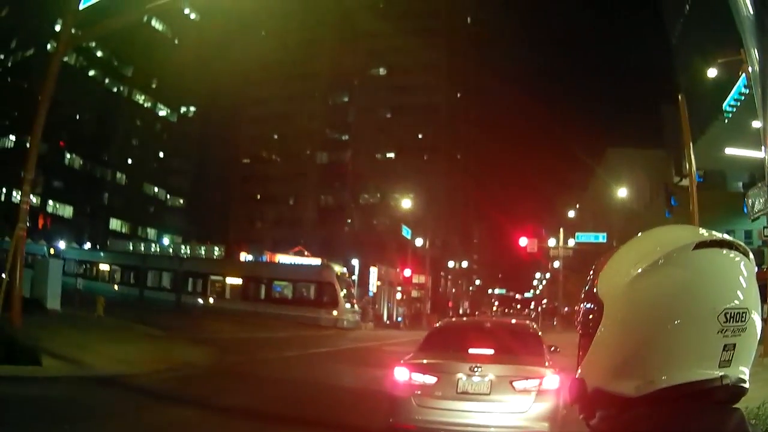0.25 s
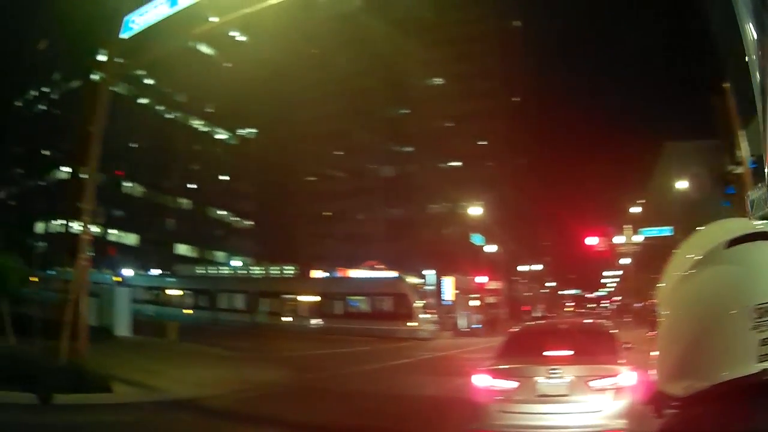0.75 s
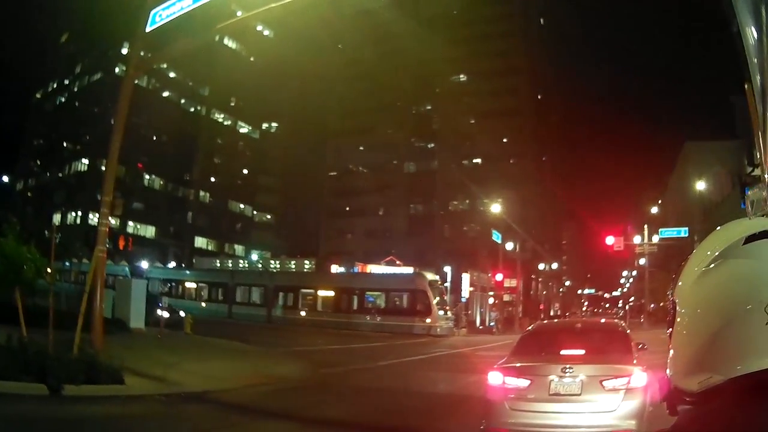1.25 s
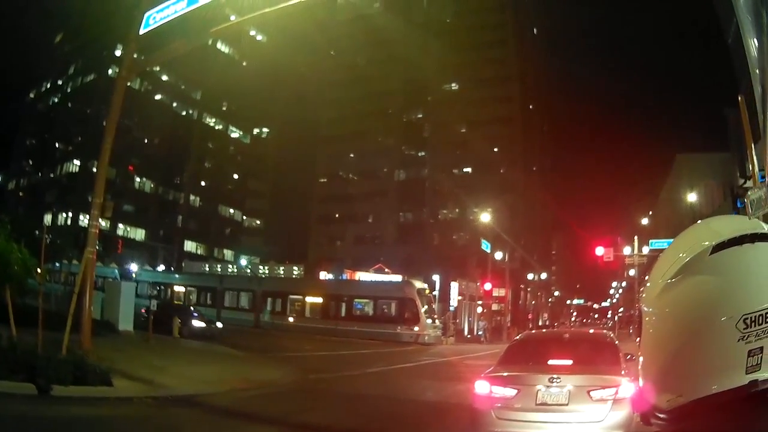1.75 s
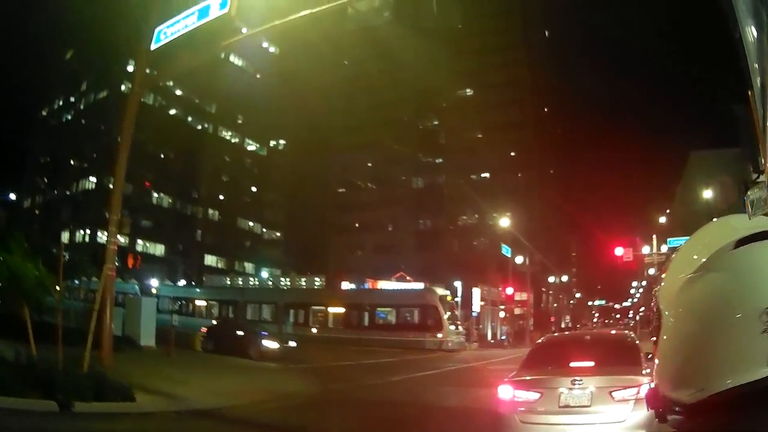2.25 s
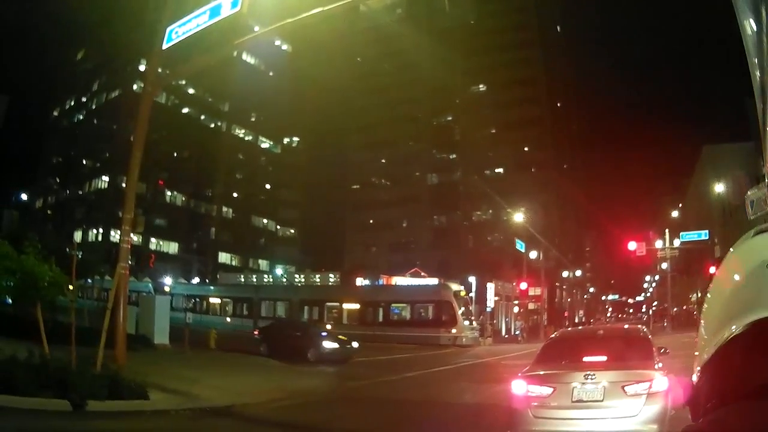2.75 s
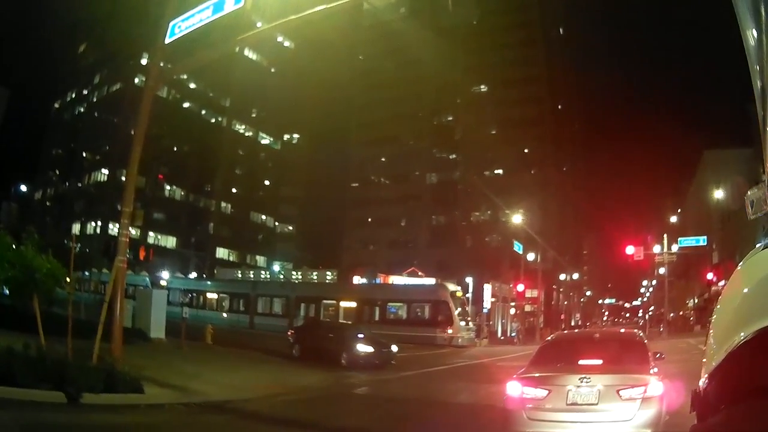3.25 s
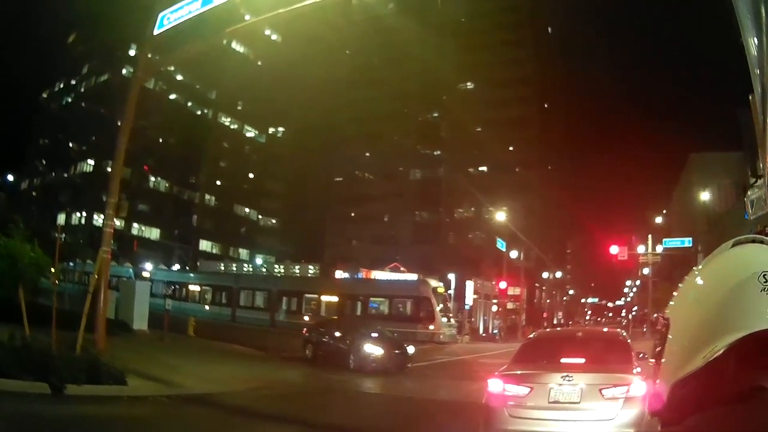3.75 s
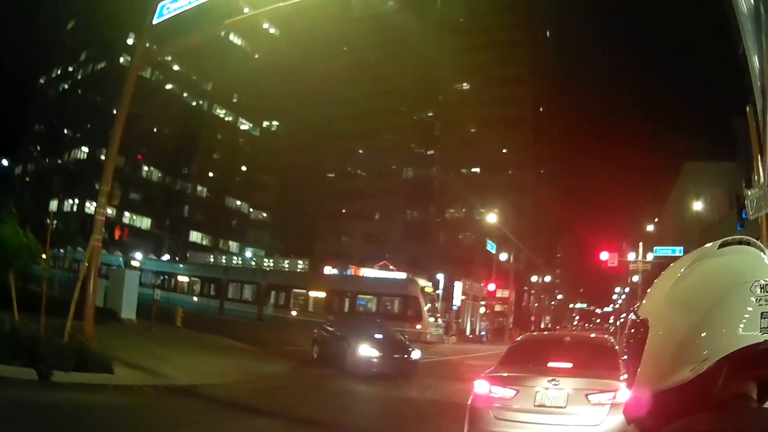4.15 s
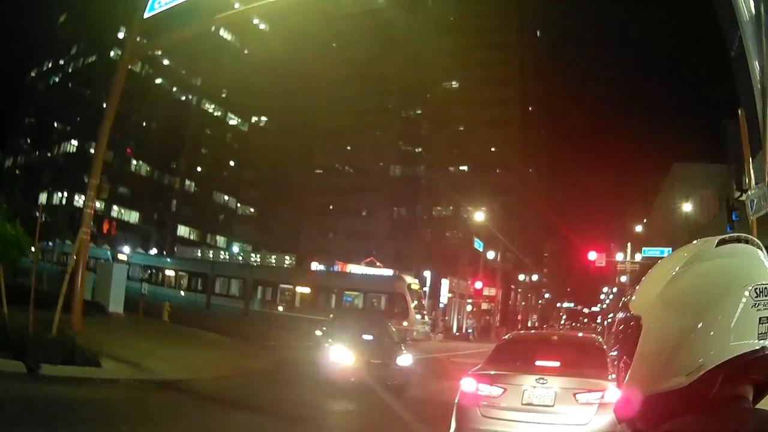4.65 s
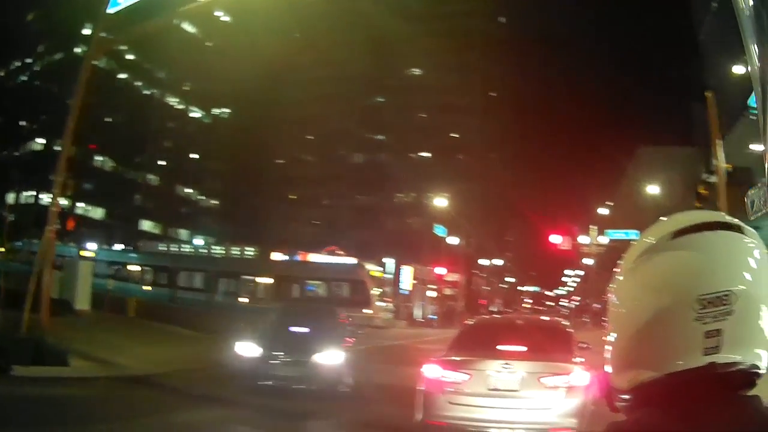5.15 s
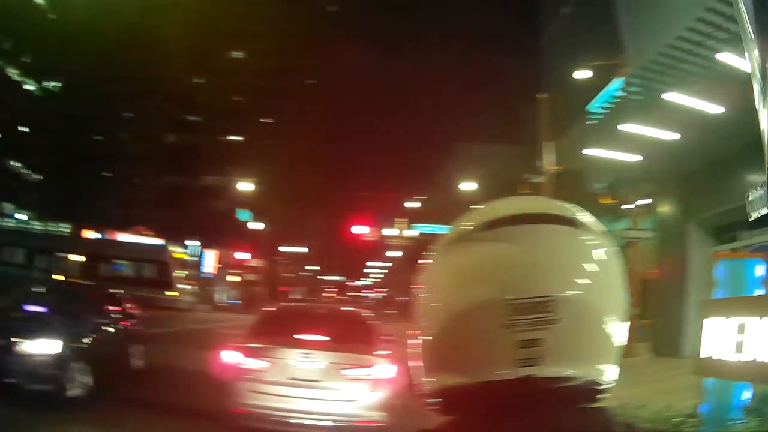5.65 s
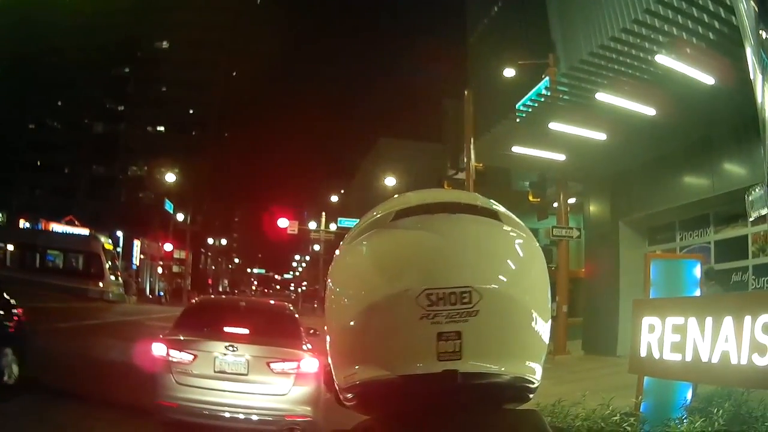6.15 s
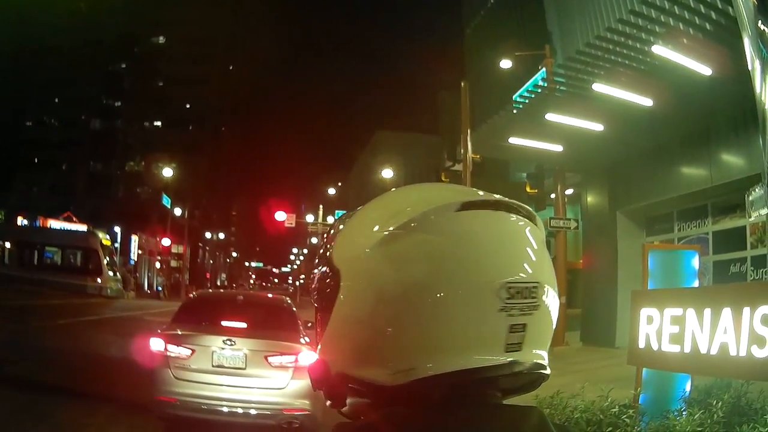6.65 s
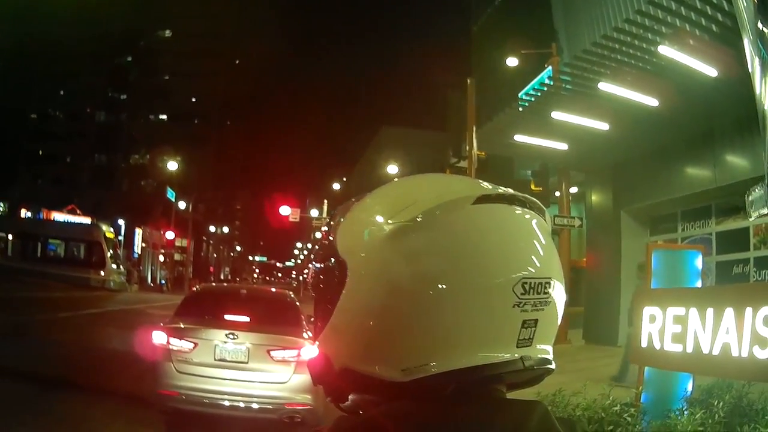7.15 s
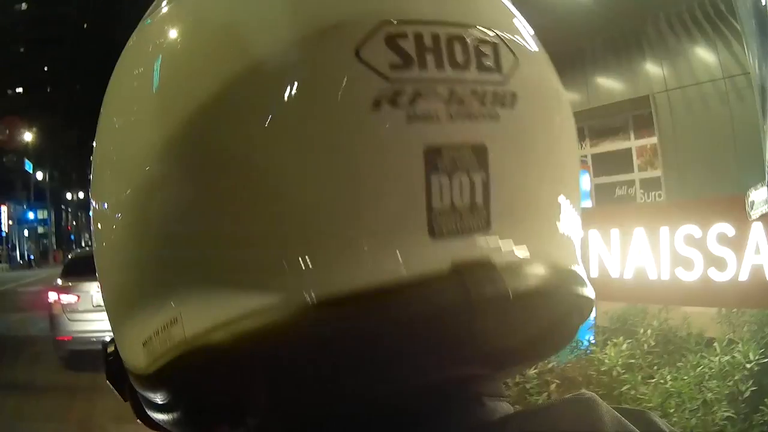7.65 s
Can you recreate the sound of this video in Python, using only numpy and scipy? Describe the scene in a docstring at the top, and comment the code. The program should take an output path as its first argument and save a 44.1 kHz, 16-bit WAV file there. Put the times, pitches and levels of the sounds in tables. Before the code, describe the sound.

A four-cylinder motorcycle idles close to the microphone outdoors in a city street, a deep bassy throb with muffled exhaust burble and light mechanical clatter. The idle hunts gently and briefly stumbles. After about six seconds the throttle opens, two tiny whistles lead into a hard barking blip, revs fall back, and softer pulls follow. Faint street noise and microphone hiss lie beneath.

```python
"""A four-cylinder motorcycle idles: its exhaust throbs as a sum of waves tied to the firing rate, single
firings ring the silencer, gas hisses, and filtered noise clatters like valve gear in the engine cases.
Now and then a weak firing makes the level dip. After six seconds the throttle is worked and each pull
swells the sound; two short whistling tones come, then the hardest blip barks a few times, and more pulls
follow. Faint street noise and microphone hiss, made of coloured noise, lie under it all."""
import sys
import numpy as np
from scipy import signal
from scipy.fft import rfft, irfft
from scipy.io import wavfile
from scipy.ndimage import uniform_filter1d

SR = 44100
rng = np.random.default_rng(int(sys.argv[2]) if len(sys.argv) > 2 else 0)


def dump(signal):
    """Clip the signal to [-1, 1] and save it as 16-bit WAV at the path in sys.argv[1]."""
    limited = np.clip(np.atleast_2d(signal).T, -1, 1)
    pcm = np.round(limited * 32767).astype(np.int16)
    wavfile.write(sys.argv[1], SR, pcm)


N = 348831
TIME = np.arange(N) / SR  # s

# weak firings: (time [s], length [s], dip of the throb [dB], ragged burning against the throb [dB])
WEAK_FIRINGS = [(.32, 0.04, -2.5, -14), (2.83, 0.034, -5.5, 3), (4.14, 0.014, -7, -7),
                (6.224, 0.042, -10, -11), (6.35, 0.016, -5, -11.5), (6.517, 0.024, -6.5, -21),
                (6.683, 0.023, -7, -23), (6.856, 0.059, -6, -16), (6.963, 0.034, -18, -27),
                (7.08, .02, -3.5, -7.5), (7.295, 0.026, -4.5, -10), (7.385, .025, -5, -8),
                (7.568, 0.089, -2.5, -11), (7.9, 0.055, -2.5, -13)]


def undb(db):
    """Turn decibels into a gain."""
    return 10 ** (np.asarray(db) / 20)


def unit(x):
    """Scale a sound to an average strength (rms) of 1."""
    return x / np.sqrt(np.mean(x ** 2))


def curves(rows):
    """Join the values in each column of a table by straight lines in time."""
    s, *columns = np.transpose(rows)
    return [np.interp(TIME, s, column) for column in columns]


def noise():
    """White noise: all pitches equally strong."""
    return rng.standard_normal(N)


def walk(rate):
    """A smooth random curve of rms 1 that changes about rate times a second."""
    hold = int(SR / rate)
    steps = np.repeat(rng.standard_normal(N // hold + 1), hold)
    return unit(uniform_filter1d(steps, hold)[:N])


def bell(s, length):
    """A smooth swell of height 1 around the time s."""
    return np.exp(-np.minimum(((TIME - s) / length) ** 2, 50))


def fade(x, decay_s):
    """Turn every impulse into an exponential decay of the same height."""
    return signal.lfilter([1], [1, -np.exp(-1 / (decay_s * SR))], x)


def band(x, order, low_hz, high_hz):
    """Keep the pitches between two limits."""
    return signal.sosfilt(signal.butter(order, [low_hz, high_hz], "band", fs=SR, output="sos"), x)


def ring(x, resonances):
    """Let a sound ring each resonance: the narrower its width, the longer it rings."""
    total = 0
    for hz, width, db in resonances:
        total = total + undb(db) * signal.lfilter(*signal.iirpeak(hz, hz / width, SR), x)
    return total


def colour(x, points):
    """Filter to the given (frequency [Hz], level [dB]) spectrum; white noise keeps its power."""
    hz, db = np.transpose(points)
    size = 8192
    f = np.maximum(np.fft.rfftfreq(size, 1 / SR), 1)
    # folding the cepstrum forward makes the filter respond only after its input
    cepstrum = irfft(np.log(undb(np.interp(np.log(f), np.log(hz), db))))
    cepstrum[1:size // 2] *= 2
    cepstrum[size // 2 + 1:] = 0
    response = irfft(np.exp(rfft(cepstrum)))
    return signal.fftconvolve(x, response / np.linalg.norm(response))[:N]


def throb(turns, hz, first_db, second_db, waver_db=2.0):
    """Smooth pressure wave at the tailpipe; it lopes once per crank turn, and its overtones waver."""
    # overtones: (multiple of the firing rate, level against the second harmonic [dB])
    overtones = [(3, -9.5), (4, -16), (5, -25.5), (6, -39.5), (7, -28.5), (9, -31)]
    lope, uneven = .13, .065  # depth of the swing per crank turn, and of the chance change between firings
    half_order_db, outlet_hz = -14, 46  # crank-rate tone against the fundamental; cut-off of the outlet
    angle = 2 * np.pi * turns
    # the fundamental lies under the pipe's first resonance, so it swings against its overtones
    wave = undb(first_db) * np.cos(angle) - undb(second_db) * np.cos(2 * angle)
    for multiple, db in overtones:
        wave -= undb(second_db + db + waver_db * walk(25)) * np.cos(multiple * angle)
    # the crank rate, half the firing rate, only gets out once the revs lift it above the outlet's cut-off
    outlet_loss = 1 + (2 * outlet_hz / hz) ** 10
    wave -= undb(first_db + half_order_db) * np.sin(angle / 2) / outlet_loss
    swing = 1 + lope * np.sin(angle / 2) + uneven * walk(60)
    return np.sqrt(2) * wave * swing * undb(stumbles())


def burble(first_db):
    """Ragged burning fills the bass between the harmonics, most of all around a stumble."""
    steady_db = -20  # against the throb
    spread = 1.9  # a stumble stays ragged this many times longer than it dips
    share = undb(steady_db)
    for s, length, _, db in WEAK_FIRINGS:
        share = share + undb(db) * bell(s, spread * length)
    return undb(first_db) * share * unit(band(noise(), 3, 42, 125))


def firings(turns, scatter_db, jitter_s):
    """One impulse a firing; cylinders differ, and no two burns are alike."""
    # the four cylinders in firing order: (strength [dB])
    cylinders = [5.5, 4.5, 7.1, -3.5]
    at = np.flatnonzero(np.diff(np.floor(turns)) > 0)
    chance = rng.standard_normal((len(at), 2))
    late = (jitter_s * SR * chance[:, 0]).astype(int)
    strength_db = np.resize(cylinders, len(at)) + scatter_db * chance[:, 1]
    pulses = np.zeros(N)
    pulses[np.clip(at + late, 0, N - 1)] = undb(strength_db)
    # the energy is shared out over the firings, so loudness does not climb with their rate
    return pulses / np.sqrt(np.gradient(turns))


def silencer(x):
    """The chambers ring; the packing soaks up the treble and the small outlet radiates little bass."""
    # silencer resonances: (frequency [Hz], width [Hz], level [dB])
    chambers = [(175, 56, -8), (236, 136, 16.5), (284, 9.9, -38), (388, 110, -7.5)]
    return band(ring(x, chambers), 4, 115, 390)


def exhaust(turns, hz, level_db, pulse_db=-7, gas_db=-6, echo_s=0.00876, echo_db=-5):
    """Each firing knocks the silencer, echoes once along the pipe and sends a turbulent puff through it."""
    pulses = firings(turns, scatter_db=0.6, jitter_s=0.00023)
    knocks = pulses + undb(echo_db) * np.roll(pulses, int(echo_s * SR))
    # the faster the engine turns, the cleaner it fires
    puffs = noise() * fade(pulses, decay_s=.035) * hz.min() / hz
    mix = undb(pulse_db) * unit(silencer(-knocks)) + undb(gas_db) * unit(silencer(puffs))
    return undb(level_db) * mix


def rush(pull_gain, drift_db):
    """Broad hiss of gas: faint at idle, stronger with every pull."""
    # colour of the gas rush: (frequency [Hz], level [dB])
    gas_colour = [(500, -6), (1300, 25), (2900, 11.5), (4200, 9.5), (6000, 6), (10000, 7.5), (15000, 6)]
    idle_db, drift_share = -72, 4.1  # level before drift; how many times the drift it follows
    return (undb(idle_db + drift_share * drift_db) + pull_gain) * colour(noise(), gas_colour)


def cases(x):
    """Broad radiation of the engine cases with a few narrow rings on top."""
    # what the engine cases radiate: (frequency [Hz], level [dB])
    radiation = [(350, -18.5), (500, -0.5), (700, -1), (900, -0.5), (1200, 2.5), (1530, 0), (1850, -7),
                 (2400, -11), (3000, -13.5), (4200, -19), (7000, -31), (15000, -51)]
    # narrow rings of the engine cases: (frequency [Hz], width [Hz], level [dB])
    narrow_rings = [(879, 8.6, 1.5), (988, 34, -9.5), (1275, 20, -17), (1500, 125, -10.5), (2240, 430, -10)]
    return colour(x + ring(x, narrow_rings), radiation)


def clatter(turns, level_db, tick_db=-7.0, whirr_db=-1, flicker_db=1.05):
    """Valves tick once a firing over the flickering whirr of chain and gears; both ring the cases."""
    # the ticks fall halfway between firings
    ticks = noise() * fade(firings(turns + .5, scatter_db=0.5, jitter_s=0.00051), decay_s=0.013)
    whirr = noise() * undb(flicker_db * walk(25))
    return undb(level_db) * cases(undb(tick_db) * unit(ticks) + undb(whirr_db) * whirr)


def street_and_hiss():
    """Steady random noise, coloured to stand for faint street noise and microphone hiss."""
    # street noise and microphone hiss: (frequency [Hz], relative level [dB])
    floor = [(20, 16), (60, 19), (150, 33), (500, 5.5), (1500, 6), (3000, -1), (6000, -1.5), (10000, -2),
             (15500, -2.5)]
    return undb(-53) * colour(noise(), floor)


def stumbles():
    """Brief level dips where a cylinder burns weakly (dB)."""
    return sum(db * bell(s, length) for s, length, db, _ in WEAK_FIRINGS)


def pulls():
    """Load opens quickly, holds and lets go: throb, burn and clatter (dB), and gas rush (gain)."""
    # throttle or clutch loads the engine: (time [s], length [s], stronger throb [dB], harder burn [dB],
    # extra clatter [dB], gas rush [dB])
    loads = [(6.038, 0.15, 0.5, 3.5, 3.5, -70), (6.245, 0.095, 1.5, 8, 6.5, -64),
             (6.393, 0.096, 2.5, -1, -1.5, -74), (6.688, 0.12, 3, 4, 4.5, -60),
             (7.123, .14, 0, 5.5, 2, -72), (7.652, .27, 0.5, 7.5, 6.5, -61)]
    attack_s, release_s = .035, .025
    total = 0
    for s, length, throb_db, burn_db, clatter_db, rush_db in loads:
        rise = np.clip((TIME - s) / attack_s, 0, 1)
        release = np.exp(-np.maximum(TIME - s - length, 0) / release_s)
        total = total + np.outer([throb_db, burn_db, clatter_db, undb(rush_db)], rise * release)
    return total


def whistles(waver_hz=8):
    """Two short whistling tones of unsteady pitch, just before the hard blip."""
    # whistling tones: (time [s], middle frequency [Hz], level [dB])
    tones = [(6.135, 960, -55), (6.197, 977, -50)]
    waver = waver_hz * walk(80)
    total = 0
    for s, hz, db in tones:
        tone = np.sin(2 * np.pi * np.cumsum(hz + waver) / SR)
        total = total + undb(db) * bell(s, .02) * tone
    return np.sqrt(2) * total


def barks(crack_s=0.0012, crack_top_hz=2200):
    """Hard firings punch straight through the silencer; a short, dull crack of gas rides on each crest."""
    # hard firings as the throttle snaps open: (time [s], thump [dB], crack before filtering [dB])
    hard_firings = [(6.274, -19.5, -33.5), (6.290, -21, -38), (6.302, -14, -25.5), (6.323, -14, -26),
                    (6.342, -31, -36), (6.358, -21.5, -51), (6.409, -21.5, -37)]
    punch = band(signal.unit_impulse(4096), 5, 105, 370)
    crest = punch.argmax()
    thumps, cracks = np.zeros((2, N))
    for s, thump_db, crack_db in hard_firings:
        at = int(s * SR)
        thumps[at] = undb(thump_db)
        cracks[at + crest] = undb(crack_db)
    dull = signal.butter(1, crack_top_hz, fs=SR, output="sos")
    gas = signal.sosfilt(dull, noise() * fade(cracks, crack_s))
    return signal.fftconvolve(thumps, -punch / np.abs(punch).max())[:N] + cases(gas)


def scene():
    """One crankshaft drives all the engine's layers; their levels follow its speed and load."""
    # the idle hunts a little: (time [s], firing rate [Hz])
    idle = [(0.0, 39.2), (0.38, 37.4), (0.66, 40.2), (0.96, 37.3), (1.14, 40.1), (1.29, 37.7), (1.56, 40.2),
            (1.76, 37.3), (2.49, 40.1), (2.84, 38.2), (3.17, 40.6), (3.3, 39.3), (3.43, 40.4), (3.69, 38.8),
            (3.95, 39.8), (4.16, 37.9), (4.43, 40.5), (4.85, 38.7), (4.97, 39.9), (5.29, 38.3),
            (5.71, 40.0), (5.9, 37.6)]
    # the revs once the rider works the throttle: (time [s], firing rate [Hz])
    revs = [(6.022, 40.06), (6.13, 48.29), (6.239, 47.53), (6.35, 93.5), (6.401, 96.77), (6.5, 81.95),
            (6.6, 73.64), (6.69, 53.68), (6.761, 45.64), (7.02, 40.17), (7.208, 45.92), (7.438, 38),
            (7.611, 38), (7.689, 44.1), (7.892, 52.5)]
    # drift of the engine's level at the microphone, before each layer's share: (time [s], level [dB])
    drift = [(0, -0.5), (.22, 0.5), (.35, 0), (.7, 1), (1.55, 0.4), (1.75, -0.2), (2.15, 0.6), (3.3, -0.3),
             (3.48, 0.65), (3.88, 0), (4.2, -1.5), (4.46, 0.7), (4.62, -1), (5.15, -0.85), (5.62, 1.5),
             (6.0, 1), (7.0, -1), (7.55, 0.4)]
    # how a layer's level is made up: (base level at idle [dB], slope with revs [dB per octave],
    # share of the burn [1], share of a stumble [1], share of the drift [1])
    second_law = (-33.5, -9.5, 1.04, 0.5, 1.34)
    silencer_law = (-46.5, 12.5, 1.1, 0.35, 1.44)
    clatter_law = (-59.5, 10, 0, -0.05, 1.78)
    idle_hz = 39.2
    clatter_lag_s = 0.062  # chain and gears take this long to follow the revs
    # throb level at high revs; below the knee the pipe radiates less and less of it, at this filter order
    throb_db, knee_hz, knee_order = -19, 51.6, 5.96

    hz, = curves(list(idle) + list(revs))
    drift_db, = curves(drift)
    push_db, burn_db, rattle_db, pull_gain = pulls()
    dip_db = stumbles()
    octaves = np.log2(hz / idle_hz)
    late_octaves = fade(octaves, clatter_lag_s) / (clatter_lag_s * SR)

    def level(law, octaves_up):
        """Level of a layer (dB) from the revs (octaves over idle), the burn, the stumbles and the drift."""
        db, slope, burn, dip, drift_share = law
        return db + slope * octaves_up + burn * burn_db + dip * dip_db + drift_share * drift_db

    pipe_loss_db = 10 * np.log10(1 + (knee_hz / hz) ** (2 * knee_order))
    first_db = throb_db - pipe_loss_db + push_db
    turns = np.cumsum(hz * (1 + 0.0091 * walk(30))) / SR  # firings counted so far, at a slightly uneven rate
    bass = throb(turns, hz, first_db, level(second_law, octaves)) + burble(first_db)
    tailpipe = bass + exhaust(turns, hz, level(silencer_law, octaves)) + rush(pull_gain, drift_db) + barks()
    machine = clatter(turns, level(clatter_law, late_octaves) + rattle_db) + whistles()
    return (tailpipe + machine + street_and_hiss())[None]


def record(dry):
    """A steep low-pass filter removes the treble above 15500 Hz."""
    return signal.sosfilt(signal.ellip(10, .1, 80, 15500, fs=SR, output="sos"), dry)


dry = scene()
out = record(dry)
dump(out)
```